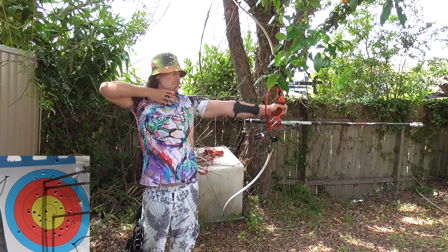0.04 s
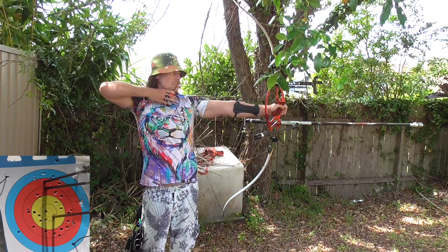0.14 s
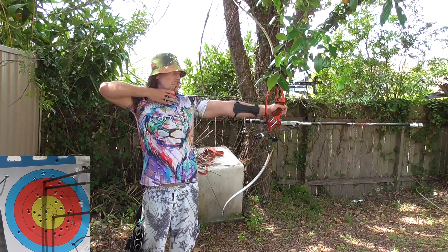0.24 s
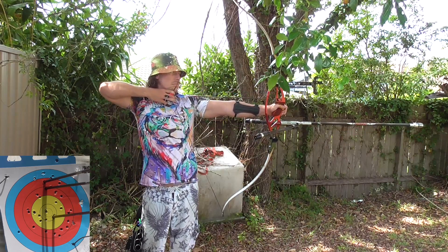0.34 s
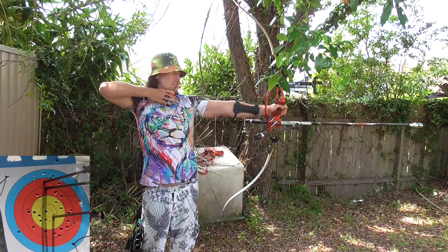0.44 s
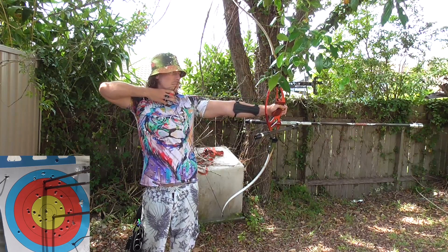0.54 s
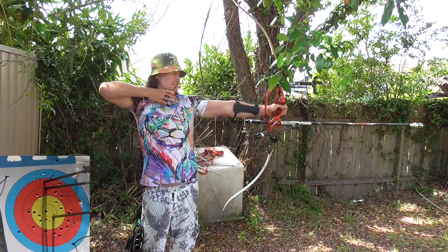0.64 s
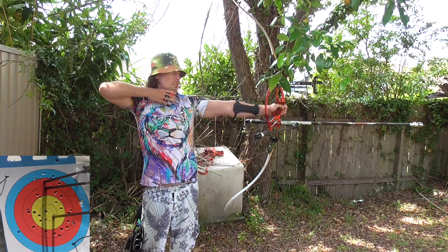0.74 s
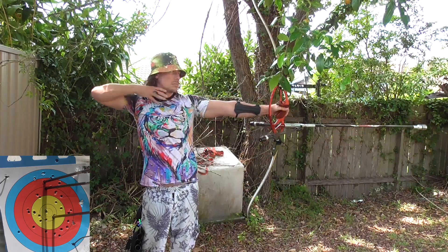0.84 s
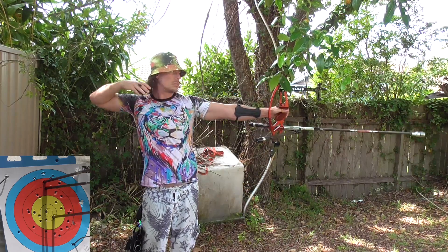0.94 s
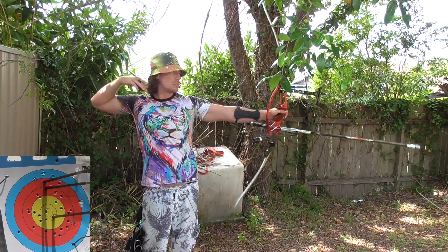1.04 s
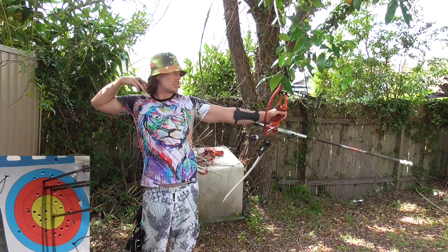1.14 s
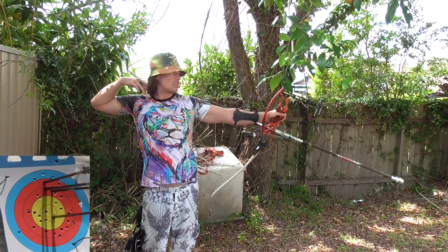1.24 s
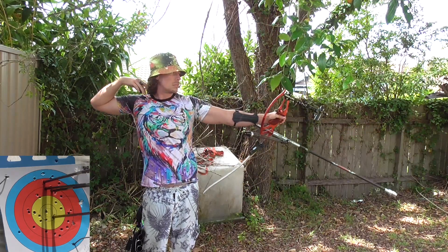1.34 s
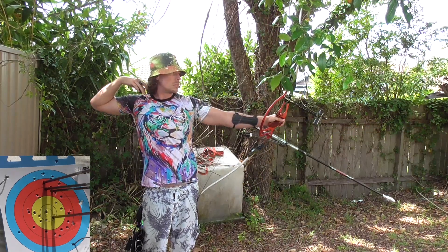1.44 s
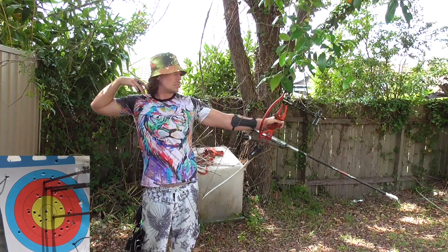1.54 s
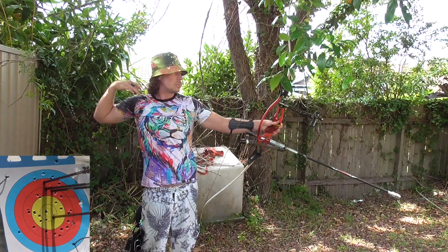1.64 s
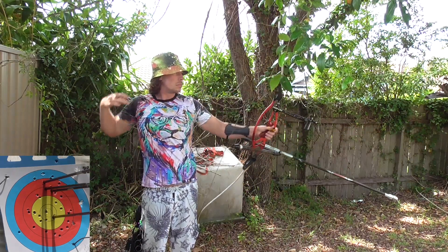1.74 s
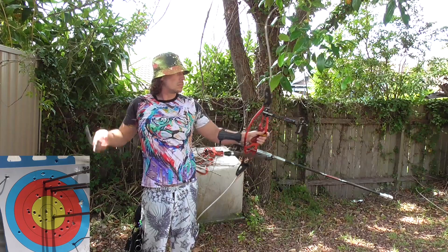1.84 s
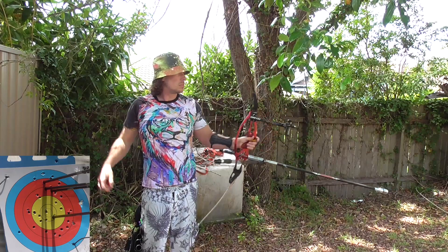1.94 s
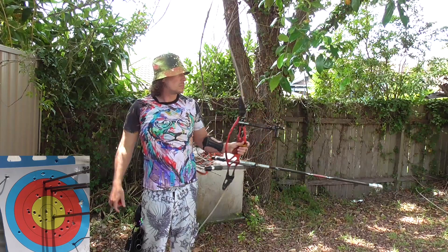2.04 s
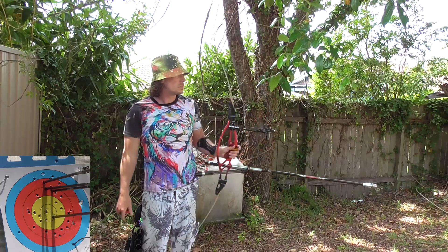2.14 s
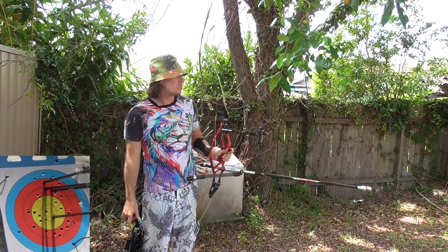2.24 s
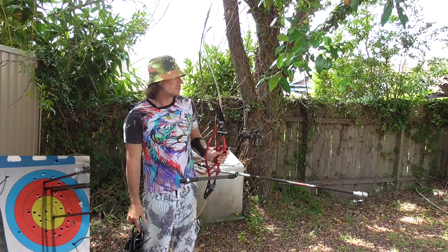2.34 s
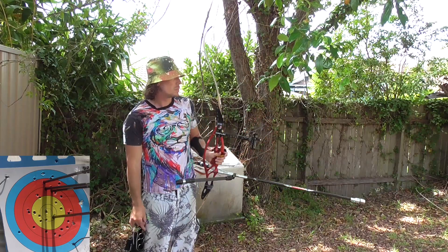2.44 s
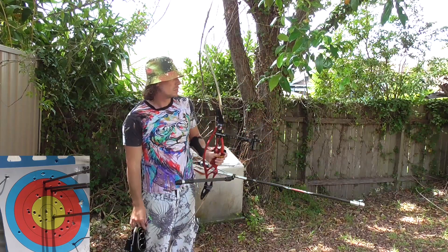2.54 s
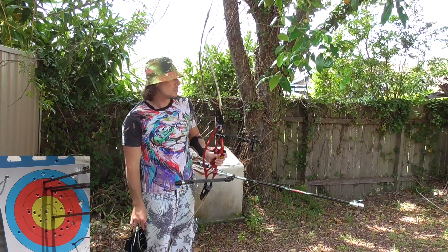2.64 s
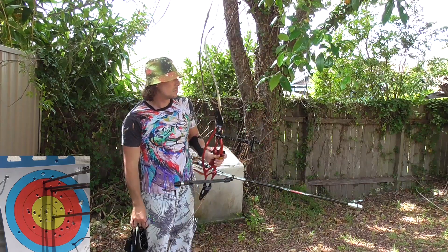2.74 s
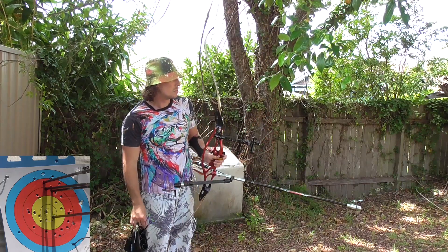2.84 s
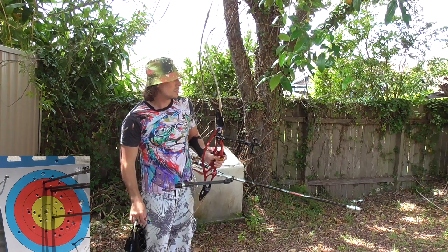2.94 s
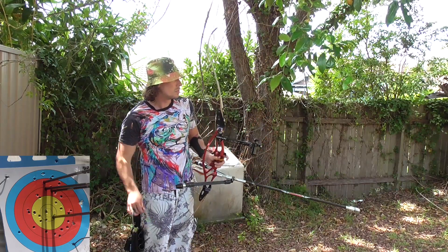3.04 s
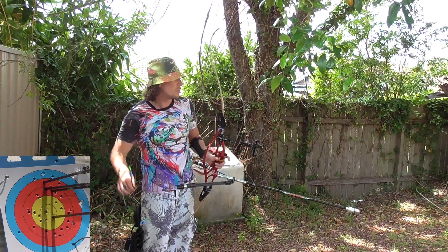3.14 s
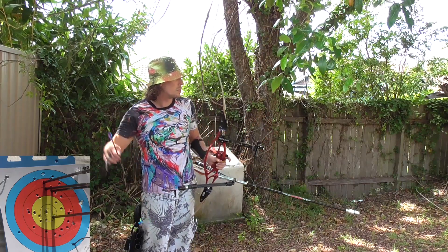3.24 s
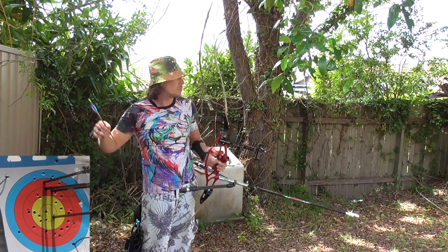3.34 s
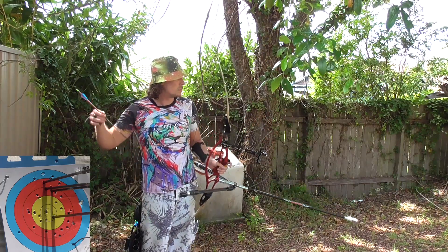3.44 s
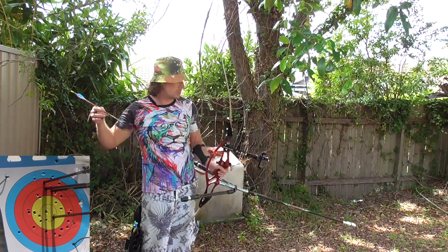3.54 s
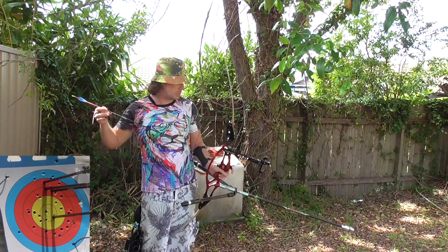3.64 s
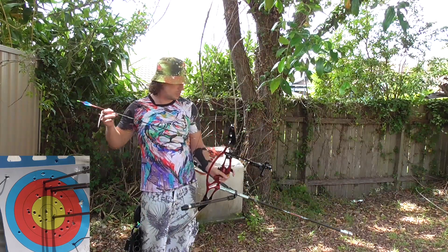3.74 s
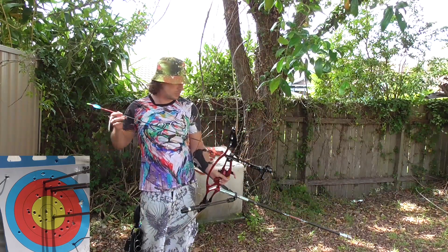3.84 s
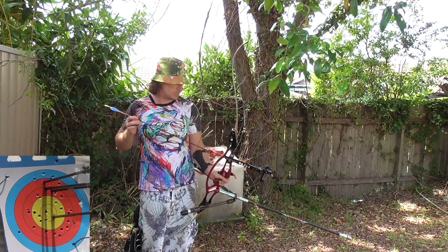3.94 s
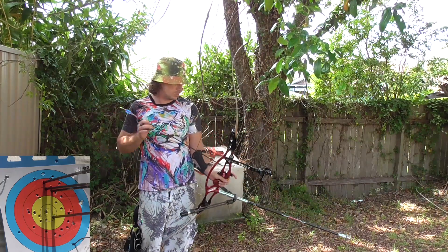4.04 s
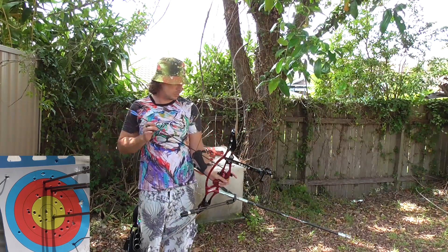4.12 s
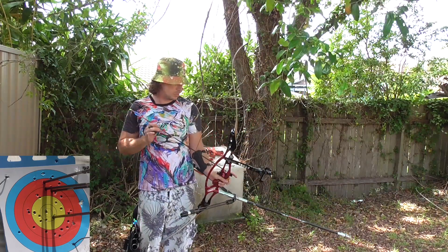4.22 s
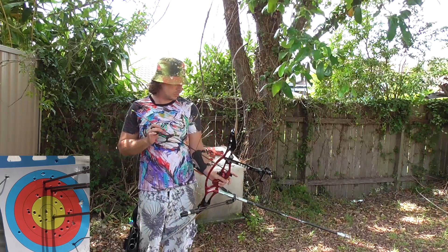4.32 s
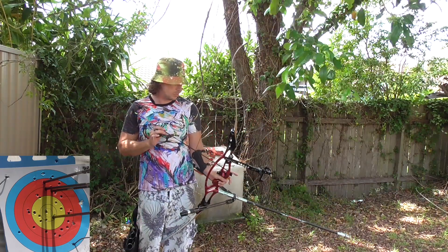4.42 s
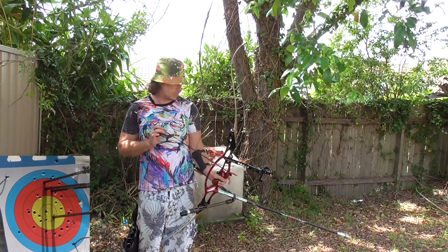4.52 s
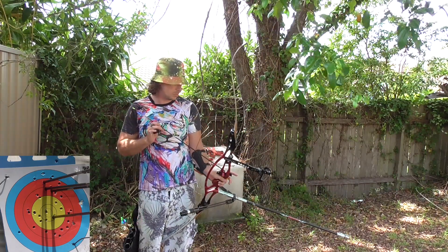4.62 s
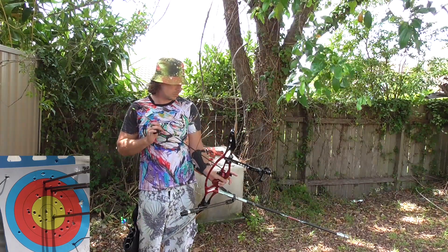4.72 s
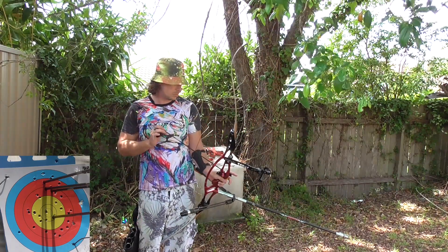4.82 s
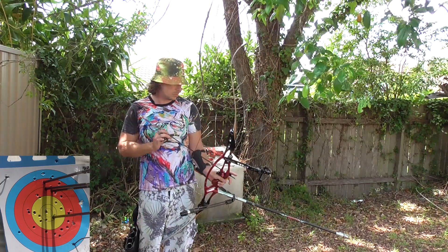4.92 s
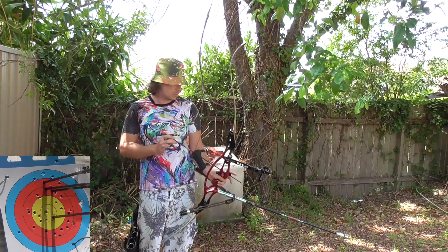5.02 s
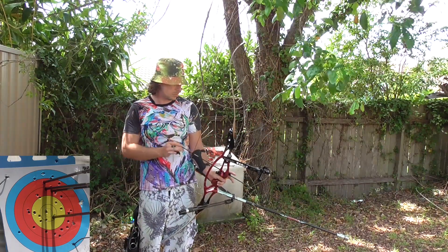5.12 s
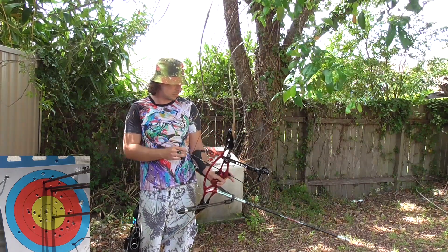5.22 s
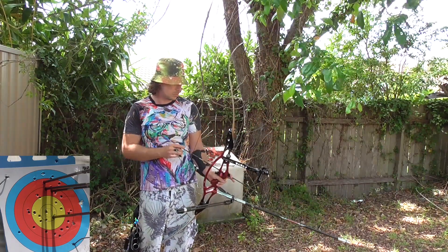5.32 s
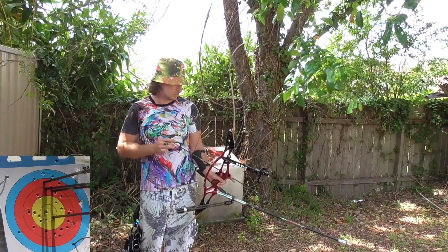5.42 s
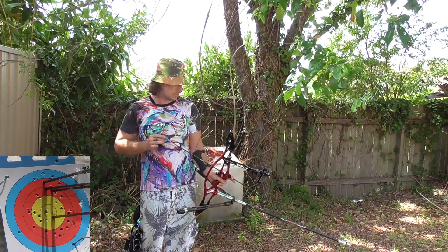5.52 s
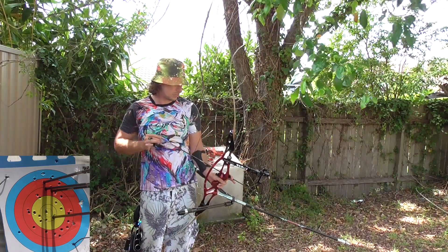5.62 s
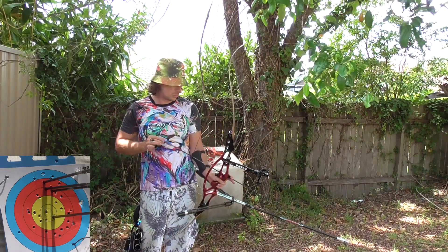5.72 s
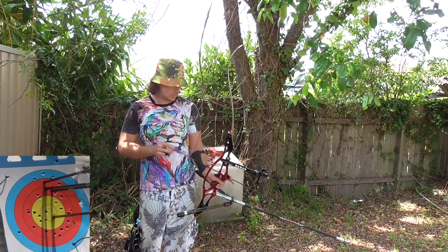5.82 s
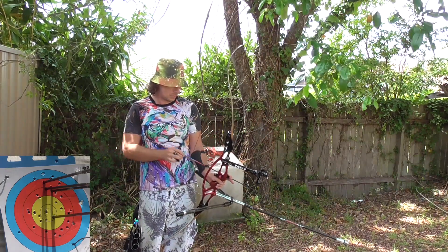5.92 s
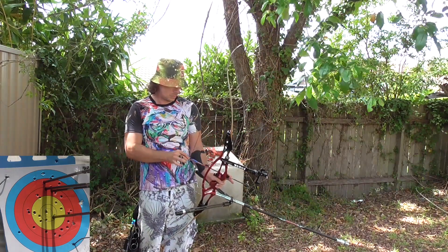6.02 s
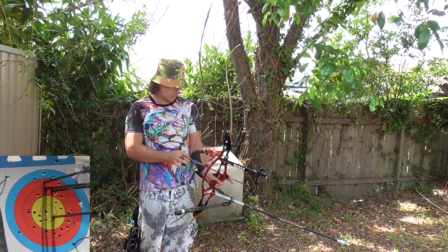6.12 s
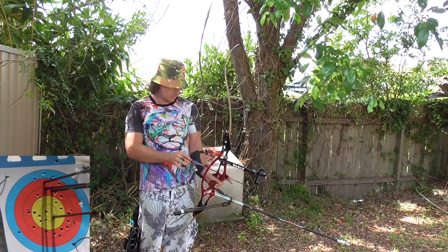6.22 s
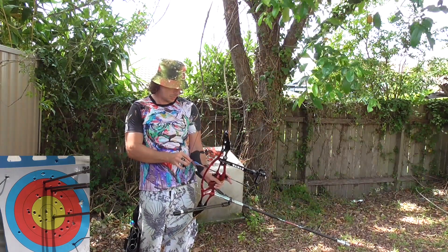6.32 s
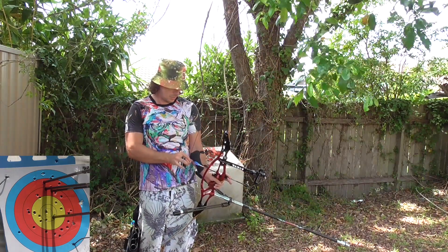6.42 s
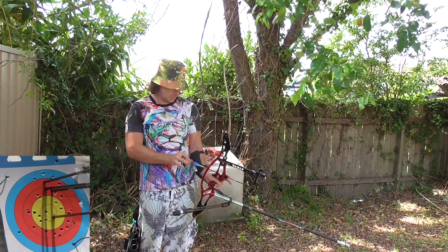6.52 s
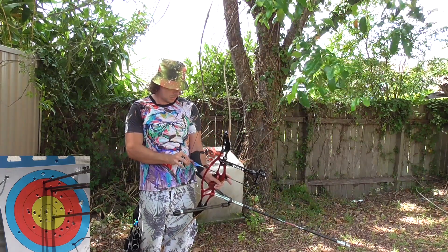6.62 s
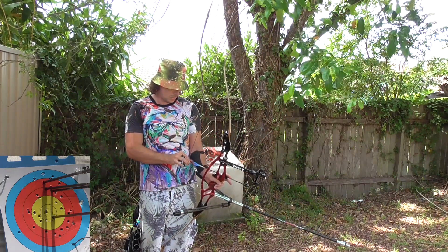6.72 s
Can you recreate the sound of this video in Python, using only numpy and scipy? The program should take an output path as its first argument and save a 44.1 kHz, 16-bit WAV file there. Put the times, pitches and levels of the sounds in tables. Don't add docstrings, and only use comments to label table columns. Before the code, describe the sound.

Outdoors in a small fenced yard, faint traffic rumble and leaf hiss. A thin steel blade clicks and bounces, then a bow releases with a loud, sharp crack and buzzing rattle. A softer thump follows as the arrow strikes. The bow swings down with a faint low moan; soft rubbing and quiver knocks lead to crisp hollow taps and small squeaky scrapes. A small nearby microphone overloads slightly on the shot.

```python
import sys
import numpy as np
from scipy import signal
from scipy.fft import rfft, irfft
from scipy.io import wavfile
from scipy.ndimage import uniform_filter1d

SR = 44100
rng = np.random.default_rng(int(sys.argv[2]) if len(sys.argv) > 2 else 0)


def amplitude_ratio(level_db):
    exponent = np.asarray(level_db, float) / 20
    return 10 ** exponent


def transcribe(u):
    v = np.clip(np.atleast_2d(u).T, -1, 1)
    q = np.round(v * 32767).astype(np.int16)
    wavfile.write(sys.argv[1], SR, q)


N = 298557
BORE_HZ = 888


def evened(x):
    return x / np.sqrt(np.mean(x ** 2) + 1e-20)


def read(points, hz):
    f, value = np.transpose(points)
    return np.interp(np.log(hz + 1), np.log(f + 1), value)


def along(rows):
    s, level_db = np.transpose(rows)
    return np.interp(np.arange(N) / SR, s, level_db)


def add(mix, s, sound):
    part = mix[round(s * SR):][:len(sound)]
    part += sound[:len(part)]


def burst(s, rise, peak_db, hold, fade):
    t = np.arange(N) / SR - s
    climb_db = 30 * np.minimum(t, 0) / rise
    fade_db = fade * np.maximum(t - hold, 0)
    return amplitude_ratio(peak_db + climb_db - fade_db)


def resonate(x, hz, width):
    turn = np.exp(2j * np.pi * np.cumsum(hz * np.ones(len(x))) / SR)
    r = np.exp(-np.pi * width / SR)
    return 2 * (turn * signal.lfilter([1 - r], [1, -r], x / turn + 1e-18)).real


def resonate_twice(x, hz, width):
    return resonate(resonate(x, hz, width), hz, width)


def noise(colour, patchy_db, size=512):
    hz = np.fft.rfftfreq(size, 1 / SR)
    a, b, patches = rng.standard_normal((4 * N // size + 5, len(hz), 3)).T
    patches = uniform_filter1d(patches, size=7, axis=0)
    patches = evened(uniform_filter1d(patches, size=12, axis=1))
    outside = (hz < colour[0][0]) | (hz > colour[-1][0])
    level_db = np.where(outside, -99, read(colour, hz))
    z = (a + 1j * b) * amplitude_ratio(level_db[:, None] + patchy_db * patches)
    return evened(signal.istft(z, nperseg=size, noverlap=size - size // 4)[1][:N])


def fuzzy_tone(hz, width, clean):
    tone = np.sqrt(2) * np.sin(2 * np.pi * np.cumsum(hz * np.ones(N)) / SR)
    fuzz = evened(resonate_twice(rng.standard_normal(N), hz, width))
    return evened(clean * tone + fuzz)


def ring(modes, seconds):
    t = np.arange(round(seconds * SR)) / SR
    out = 0
    for k, (hz, db, t60) in enumerate(modes):
        out = out + (-1) ** k * amplitude_ratio(db - 60 * t / t60) * np.sin(2 * np.pi * hz * t)
    return out


def struck(blows, modes, sense, ring_db, lead, trail):
    out, body = np.zeros(N), ring(modes, 1.)
    reach = 220
    for s, db, ms in blows:
        u = np.arange(-reach, reach) / SR / (ms / 1000)
        swing = (1 - np.where(u < 0, lead, trail) * u ** 2) * np.exp(-u ** 2 / 2)
        add(out, s - reach / SR, sense * amplitude_ratio(db) * swing)
        add(out, s, amplitude_ratio(db + ring_db) * body)
    return out


def bore(x, feedback):
    loop = np.zeros(round(SR / BORE_HZ) + 1)
    loop[0], loop[-1] = 1, -feedback
    return signal.lfilter([1], loop, x)


def traffic():
    # (time [s], level [dB])
    road = [(0.0, -48.5), (1.22, -52.5), (1.32, -52.5), (2.07, -56), (2.77, -51.5), (3.86, -54.5),
            (4.07, -51.5), (5.0, -60), (5.75, -60), (6.28, -55.5), (6.77, -56)]
    # (time [s], level [dB])
    engine = [(0.0, -53), (0.22, -57), (0.62, -58), (1.0, -60), (1.36, -60.5), (1.66, -63.5), (1.77, -63),
              (2.9, -59), (3.09, -56.5), (4.26, -54.5), (4.58, -67), (4.92, -65), (5.33, -62.5),
              (5.64, -67.5), (6.01, -60.5), (6.77, -63.5)]
    # (time [s], level [dB])
    breeze = [(0.0, -59), (1.21, -57.5), (1.47, -61), (3.28, -56), (4.79, -59), (5.0, -58.5), (5.62, -63),
              (6.07, -60), (6.77, -59.5)]
    # (frequency [Hz], level [dB per Hz])
    rumble_colour = [(12, -39), (20, -20), (48, 5.5), (70, 4), (109, -2.5), (203, 0), (264, -5.5),
                     (400, -11.5), (520, -34), (880, -120)]
    roar_colour = [(150, -21.5), (300, -3.5), (500, -0.5), (900, -2.5), (1400, -8), (2200, -16),
                   (3500, -39)]
    leaves_colour = [(1200, -14), (2000, 0.5), (4000, 0.5), (7000, -6.5), (10000, -13), (11500, -21),
                     (15500, -17.5)]
    # (frequency [Hz], width [Hz], level over the engine [dB], fading [dB per s])
    hum_lines = [(71.8, 4.3, 5.5, -0.77), (149.5, 12, 5, -3), (207.4, 14, -11.5, 1.52)]
    road_db, engine_db, breeze_db = along(road), along(engine), along(breeze)
    rumble_db = -54.0 + 0.45 * (engine_db - engine_db.mean()) + 0.15 * (road_db - road_db.mean())
    out = amplitude_ratio(rumble_db) * noise(rumble_colour, 1.5, size=2048)
    out += amplitude_ratio(road_db + 0.87) * noise(roar_colour, 1.97, size=1024)
    out += amplitude_ratio(breeze_db - 1.44) * noise(leaves_colour, 1.6)
    for hz, width, over_db, fading in hum_lines:
        hum_db = engine_db + over_db + fading * np.arange(N) / SR
        out += amplitude_ratio(hum_db) * fuzzy_tone(hz, width, 1.7)
    return out


def clicker():
    # (time [s], peak level [dB])
    bounces = [
        (0.675, -32.5),
        (0.6968, -33),
        (0.7166, -36.5),
        (0.739, -45),
        (0.791, -45),
    ]
    # (frequency [Hz], level [dB], time to die by 60 dB [s])
    blade_modes = [(1600, -5, 0.038), (1920, -4, 0.024), (2420, 0, 0.047), (2860, -6, 0.015),
                   (3190, -1.5, 0.028), (3400, -3, 0.037), (3700, 2, 0.013), (4400, -6, 0.0079),
                   (5540, -10, 0.014), (10030, -13, 0.13), (10020, -22, .08), (9580, -9, 0.04),
                   (10900, -10, 0.0099)]
    out = np.zeros(N)
    for s, db in bounces:
        chatter = rng.standard_normal(900) * np.exp(-np.arange(900) / 530.0)
        add(out, s, amplitude_ratio(db - 28.5) * np.convolve(chatter, ring(blade_modes, .2)))
    return out


def rattles():
    # (time [s], peak level [dB], ring frequency [Hz], brightness [dB])
    ticks = [(.8338, -23.5, 3860, -9), (.870, -25, 3200, -7), (0.879, -7.5, 4200, -16),
             (.8812, -8, 2800, -1), (.8822, -9, 4300, -6), (0.8957, -2, 5280, -7), (.9092, -4, 2050, -14),
             (0.9108, -8, 3200, -15), (.9172, -3, 2300, -14), (.9195, -10, 2900, -12),
             (.9225, -1, 2100, -12), (0.938, -17, 2920, -5), (.9435, -19, 2600, -13), (.955, -26, 3000, -6),
             (0.965, -20, 3100, -1), (0.9759, -12, 2600, -2), (0.9866, -8, 2210, -2), (0.998, -16, 2300, 3),
             (1.009, -27, 2300, 6), (1.0205, -14, 2300, -6), (1.0255, -24, 2500, -2),
             (1.0538, -19, 2100, -4), (1.064, -24, 2200, -1), (1.103, -35, 6000, -4),
             (1.166, -32, 2400, -6), (1.234, -29, 4900, -7), (1.377, -25.5, 3800, -19)]
    out = np.zeros(N)
    for s, db, hz, bright_db in ticks:
        tick = ring([(hz, -.1, .005), (1.4 * hz, -8, .003),
                     (4900, bright_db, .0025), (6300, bright_db - 6.0, .0025),
                     (8100, bright_db - 5.5, .002), (10300, bright_db - 16, .002)], .02)
        soft_start = np.minimum(np.arange(len(tick)) / 4.0, 1)
        add(out, s + 0.00053, amplitude_ratio(db - 7.5) * tick * soft_start)
    return out


def bow():
    # (time [s], blow level [dB], contact time [ms])
    blows = [(.8825, -21, 1.3), (.8850, -19, 0.85), (.8998, -5, 0.77), (.9047, -10, 1.2),
             (.9085, -16, 0.34), (.9112, -5.5, 0.24), (.9163, -10, 0.32), (.9192, -6.5, 0.23),
             (.9229, -10.5, 0.38), (.9272, -14.5, 0.54), (.935, -9.5, 0.88), (.9475, -12, 0.7),
             (.9585, -12.5, 1.1), (.970, -19, 1.2)]
    # (time [s], blow level [dB], contact time [ms])
    rebounds = [(.9015, -3, 1.1), (.9074, -6, .6), (.9214, -3, 0.66), (.9255, -10, .5), (.9292, -7, .6),
                (.9335, -7, .7), (.9443, -6, 0.48)]
    # (frequency [Hz], level [dB], time to die by 60 dB [s])
    limb_modes = [(91.8, -4, 0.14), (149, -34, 0.062), (170, -9, 0.12), (188, -8, 0.054), (240, -9, 0.084),
                  (288, -8.5, 0.17), (345, -19, 0.3), (460, -12.5, 0.17), (746, -1.5, 0.17),
                  (1124, -11, 0.11), (2140, -10, 0.014), (3100, -8, 0.014)]
    riser_modes = [(560, 1, 0.06), (740, 7, 0.09), (950, -3, 0.0506), (1010, -7, 0.05), (1145, -7, 0.079),
                   (1290, -1, 0.03), (1680, 2, 0.03), (2050, 5, 0.018), (2400, -6, 0.02), (2900, 3.5, 0.02),
                   (3250, 1, 0.016), (3800, 1, 0.015)]
    # (time [s], rise [s], peak level [dB], hold [s], fade [dB per s])
    buzz_bursts = [
        (0.882, 0.0062, -18, 0.00091, 1700),
        (0.897, 0.025, -22.5, 0.063, 269),
        (1.052, .03, -49, 0.019, 152),
    ]
    # (frequency [Hz], level [dB per Hz])
    buzz_colour = [(180, -46), (300, 2.5), (643, -10), (747, -3), (1130, -11), (1520, -9), (2090, -9.5),
                   (2310, -10.5), (6000, -22), (9290, -27.5), (15800, -46)]
    out = struck(blows, limb_modes, -1.12, -12, .25, .7)
    out += struck(rebounds, limb_modes, 0.47, -26.5, 0.47, 0.27)
    grain = amplitude_ratio(3.4 * evened(uniform_filter1d(rng.standard_normal(N), size=70)))
    shake = sum(burst(*row) for row in buzz_bursts) * evened(grain)
    out += shake * noise(buzz_colour, 0.44)
    riser = ring(riser_modes, 0.35)
    riser /= np.linalg.norm(riser)
    out += amplitude_ratio(-4.5) * signal.fftconvolve(shake * rng.standard_normal(N), riser)[:N]
    return out + rattles()


def squeaks():
    # (start [s], length
    # [s], level [dB], from [Hz], to [Hz])
    squeals = [(.8895, 0.0047, -24, 2250, 3100), (.909, 0.0044, -13.5, 1980, 2100),
               (.9095, .005, -29, 3100, 3300), (0.914, .012, -19, 2050, 2170),
               (0.923, .012, -26.5, 3200, 2900), (0.943, .024, -32.5, 2750, 3130),
               (0.973, .028, -34.5, 2250, 2150), (1.2475, 0.0034, -32, 3930, 3850),
               (1.2435, 0.0055, -42.5, 5600, 5500), (1.255, .005, -46, 5660, 5700)]
    # (start [s], length [s], level [dB], from [Hz], to [Hz])
    scrapes = [(3.093, 0.035, -65, 5900, 5500), (3.165, 0.036, -55, 4130, 3540),
               (3.18, 0.045, -56, 9050, 8800), (3.15, .09, -60, 8050, 8000),
               (3.286, 0.039, -51, 7200, 7100), (4.4, 0.17, -61.5, 3500, 3470),
               (4.465, 0.035, -65, 6500, 5900), (4.516, 0.035, -55, 3240, 3500),
               (4.52, 0.027, -59, 4800, 4600), (4.617, .05, -63, 10100, 10200),
               (4.618, .05, -64, 8700, 8700), (4.722, 0.022, -49.5, 3190, 2870),
               (4.752, 0.026, -48.5, 3520, 2980), (4.841, 0.038, -49, 2500, 4800),
               (4.862, 0.054, -43.5, 3210, 2960), (4.875, 0.033, -50, 4500, 4400),
               (4.935, 0.072, -46, 6040, 6100), (4.944, .05, -48, 6900, 6900),
               (4.958, 0.05, -48, 5500, 4900), (4.954, 0.05, -52, 10900, 11000),
               (5.002, 0.21, -56, 4750, 5240), (5.135, 0.13, -52, 4100, 3550),
               (5.15, 0.12, -53, 3100, 3160), (5.263, 0.071, -58, 3920, 4170),
               (5.198, 0.24, -63.5, 2560, 2610), (5.806, 0.13, -57, 4500, 4570),
               (5.83, 0.09, -56.5, 3630, 4000), (5.8, 0.12, -60.5, 2600, 2780),
               (5.851, 0.059, -58.5, 7340, 6200), (5.9, 0.041, -59, 5430, 5300),
               (5.975, .11, -53, 2810, 3400), (5.987, 0.033, -54, 5200, 4830),
               (6.028, 0.029, -49.5, 5570, 5400), (6.04, 0.049, -53, 3700, 4120),
               (6.113, .06, -59, 2600, 2540), (6.22, 0.1, -58, 3600, 3250), (6.297, 0.22, -61, 3700, 3250),
               (6.228, 0.087, -58, 2520, 2570), (6.29, 0.26, -62, 2800, 2400),
               (6.47, 0.16, -65, 5650, 5830)]
    out, white = np.zeros(N), noise([(900, -.1), (15000, -.1)], 1.1, size=256)
    wander = evened(uniform_filter1d(rng.standard_normal(N), size=500))
    for s, length, db, from_hz, to_hz in [*scrapes, *squeals]:
        u = np.arange(round(length * SR)) / (length * SR)
        on = round(s * SR) + np.arange(len(u))
        hz = (from_hz + (to_hz - from_hz) * u) * (1 + 0.028 * wander[on])
        width = 450 * np.sqrt(from_hz / 3500)
        squeak = evened(resonate_twice(white[on], hz, width))
        add(out, s, amplitude_ratio(db) * np.sin(np.pi * u) ** 0.52 * squeak)
    return out


def string_hum():
    start, stop, modes = (.9083, 1.25, [(92, -36, .7), (180.2, -35, 1.2), (172.5, -32, 1.25),
                          (287, -27, .3), (172, -13, .215), (464, -37, .45), (455, -34, .5),
                          (737, -21, .24), (94, -20, .2)])
    t = np.arange(SR) / SR
    damping = amplitude_ratio(-400 * np.maximum(t - stop + start, 0))
    out = np.zeros(N)
    add(out, start, ring(modes, 1.) * np.minimum(t / .02, 1) * damping)
    return out


def target():
    # (time [s], blow level [dB], contact time [ms])
    thumps = [(1.2372, -15, 0.2), (1.2385, -5.5, 0.21), (1.2393, -14, 0.47), (1.2451, -7, 0.28),
              (1.2459, -21, 0.41), (1.2502, -29, 0.25), (1.2563, -24, 0.46), (1.2606, -23, 0.32),
              (1.3135, -42, 0.29), (1.319, -34, 0.28), (1.333, -41, .3)]
    # (frequency [Hz], level [dB], time to die by 60 dB [s])
    butt_modes = [(193, 0, 0.058), (312, 8.5, 0.032), (466, -5.5, 0.13), (670, -26, 0.015),
                  (900, -23, 0.022), (1080, -16, 0.019), (1340, -20, 0.016), (1663, 2, .025),
                  (1860, 3, 0.017), (2280, -4, 0.036), (3970, -17, 0.04), (7880, -23, 0.023)]
    # (time [s], rise [s], peak level [dB], hold [s], fade [dB per s])
    far_echoes = [
        (1.242, 0.0076, -25, .003, 379),
        (1.333, 0.11, -44, 0.019, 133),
    ]
    # (frequency [Hz], level [dB per Hz])
    far_colour = [(150, -45), (250, -11), (340, -19), (387, -39), (486, -8), (884, -6.5), (1750, -7.5),
                  (2500, -16.5), (5340, -25.5), (12000, -48), (15600, -72), (22000, -120)]
    scatter = sum(burst(*row) for row in far_echoes) * noise(far_colour, 1.3)
    return struck(thumps, butt_modes, 1, -17, 1.1, 0.58) + scatter


def rubbing():
    # (loudest time [s], rise [s], fall [s], level [dB], main resonance [Hz])
    strokes = [(1.66, 0.07, 0.11, -59, 4650), (1.81, 0.16, 0.16, -53, 5330),
               (2.5, 0.039, 0.077, -55.5, 4480), (2.609, 0.005, 0.038, -50, 5900),
               (2.652, .015, .025, -54, 5570), (2.749, .003, 0.024, -45.5, 5600),
               (2.828, 0.0035, 0.049, -52, 6950), (3.13, 0.082, 0.23, -55, 3700),
               (3.24, 0.25, 0.067, -53.5, 4130), (3.3, 0.026, 0.023, -46.5, 6900),
               (4.525, 0.01, 0.032, -51, 5000), (4.976, 0.072, 0.11, -48, 6160),
               (5.134, 0.097, 0.22, -49.5, 4540), (5.31, .06, 0.05, -71, 4100),
               (5.59, 0.028, 0.049, -58, 4550), (5.868, 0.074, 0.29, -54.5, 4770),
               (5.95, 0.055, 0.05, -57.5, 5000), (6.04, 0.062, 0.075, -49, 4130),
               (6.12, 0.033, 0.066, -58, 2970)]
    # (frequency [Hz], level [dB per Hz])
    rub_colour = [(1200, -3.5), (2200, 3.5), (4000, 0), (7000, 0), (10500, -8), (12500, -16.5),
                  (15500, -24)]
    tube_modes = [(0.947, -4.2), (0.77, -7.0), (1.09, -5), (1.26, -5.5)]  # (share of main pitch, dB)
    out = np.zeros(N)
    hiss = evened(bore(noise(rub_colour, 2.3, size=256), 0.041))
    white = noise([(900, -.1), (15000, -.1)], 8.8, size=256)
    grain = amplitude_ratio(2.3 * evened(uniform_filter1d(rng.standard_normal(N), size=40)))
    for s, rise, fall, db, hz in strokes:
        t = np.arange(-rise, fall, 1 / SR)
        u = np.where(t < 0, t / rise, t / fall)
        on = round(s * SR) + np.round(t * SR).astype(int)
        glide = hz * (1 - 0.066 * u)
        tube = 0
        for k, k_db in tube_modes:
            tube = tube + amplitude_ratio(k_db) * evened(resonate_twice(white[on], np.minimum(k * glide, 13000), 600))
        stroke = evened(1.7 * hiss[on] + 1.1 * evened(tube))
        add(out, s + t[0], amplitude_ratio(db - 16 * abs(u) ** 0.98) * stroke)
    return (out + squeaks()) * evened(grain)


def sling():
    # (time [s], rise [s], peak level [dB], hold [s], fade [dB per s])
    moan_swell = (1.862, 0.33, -43, 0.025, 120)
    bump = (2.078, .012, -50, .004, 700)
    start, stop = 1.74, 1.93
    moan_hz, sag_hz_per_s = 176, 432
    t = np.arange(N) / SR
    u = np.clip((t - start) / (stop - start), 0, 1)
    on = uniform_filter1d(1. * (t > start) * (t < stop), size=500)
    moan = fuzzy_tone(moan_hz - sag_hz_per_s * u * (stop - start), 30, 1.7)
    rush = noise([(60, -6), (120, -3.0), (260, -6.0), (380, -20)], 0.83)
    rush_gain = on * amplitude_ratio(-50.5 - 14 * (0.5 - u))
    return on * burst(*moan_swell) * moan + (rush_gain + burst(*bump)) * rush


def taps():
    # (time [s], peak level [dB], low ring [Hz], high ring [Hz], high over low [dB])
    quiver_taps = [(1.9081, -47.5, 2050, 7500, 9.5), (2.139, -48, 2930, 7960, -12),
                   (2.603, -39, 5270, 10700, 0), (2.7452, -38.5, 4950, 8400, 3),
                   (2.7675, -48, 3000, 9450, 2), (2.8231, -40.5, 2300, 10000, 8),
                   (3.2525, -42, 3890, 8130, -3), (3.2942, -49, 3920, 8750, 13),
                   (3.3086, -44, 4600, 9740, 3), (2.7492, -39, 5800, 8000, -8),
                   (2.7455, -42, 2400, 5550, -4), (5.515, -48, 2520, 8000, -16)]
    riser_taps = [(3.6194, -54, 2620, 8060, -7), (4.1247, -45, 2780, 8040, -1),
                  (4.3251, -13, 3800, 9600, 3), (4.347, -23, 3630, 9700, 2.5),
                  (4.356, -32, 3900, 10100, -10), (4.3817, -39, 3900, 8640, -16),
                  (4.4107, -46, 2820, 9000, -7), (4.5184, -34, 4700, 6200, -4.5),
                  (4.5195, -33, 2620, 9800, -12.5), (4.7432, -18, 4000, 10500, 6),
                  (4.7466, -33.5, 4000, 10500, -5), (4.7501, -29.5, 3500, 9000, -8),
                  (4.7566, -30, 3870, 10300, -6), (4.837, -37.5, 3180, 9300, -15),
                  (4.8679, -23.5, 3940, 10130, 4), (4.8713, -34, 4600, 10340, -3),
                  (4.8744, -34, 3500, 9500, -8), (4.8799, -31, 5000, 10300, -1),
                  (4.8834, -38, 3300, 9800, -5), (4.8868, -31, 3500, 9500, -6),
                  (4.8884, -31, 3300, 9800, -5), (4.8925, -43, 3500, 9300, -5),
                  (4.7642, -42, 3300, 9000, -14), (4.899, -27, 3800, 9700, 0), (5.1455, -45, 3800, 8720, 1),
                  (6.0428, -43, 3300, 9800, -19)]
    # (share of low or high ring, level [dB], time to die by 60 dB [s])
    linger_low = [(.74, -14.5, 0.0082), (0.951, -20.5, .009), (1.45, -21.5, .009), (1.8, -20, .008)]
    linger_high = [(.8, -21, .008), (.92, -24.5, .009), (1.02, -21.5, .009)]
    # (time [s], tones (frequency [Hz], level [dB], time to die by 60 dB [s]))
    nock_s, nock_modes = (5.694, [(2270, -44, 0.034), (3540, -47, 0.014), (4380, -50, .015),
                          (6000, -55, .008), (7900, -48, 0.0081)])
    out = np.zeros(N)
    add(out, nock_s, ring(nock_modes, .03))
    for rows, feedback, slow, lag in [(quiver_taps, .3, 2.6, .0005), (riser_taps, .05, .95, .0008)]:
        for s, db, low_hz, high_hz, high_db in rows:
            mid_db = -1.5 + 0.28 * high_db
            snap = [(0.64 * low_hz, -9, .004), (low_hz, -.1, .0026), (5900, mid_db, .0016),
                    (0.806 * high_hz, high_db - 4.5, .0026), (high_hz, high_db, .0025),
                    (13500, high_db - 17.5, .0012)]
            click = ring([(hz, mode_db, slow * t60) for hz, mode_db, t60 in snap], .03)
            click += ring([(k * low_hz, k_db, t60) for k, k_db, t60 in linger_low], .03)
            click += ring([(k * high_hz, high_db + k_db, t60) for k, k_db, t60 in linger_high], .03)
            if rows is quiver_taps:
                pipe = [(k * BORE_HZ, -23 + 5 * rng.standard_normal(), 0.05) for k in range(3, 14)]
                add(out, s + lag, amplitude_ratio(db + 3.5 + 0.55 * high_db) * ring(pipe, .05))
            soft_start = np.minimum(np.arange(len(click)) / 8.3, 1)
            gain = amplitude_ratio(db + 8.0 - 5.5 * np.log2(slow))
            add(out, s + lag, gain * bore(click, feedback) * soft_start)
    return out


def shelf(x):
    x = signal.sosfilt(signal.butter(2, 1300, "high", fs=SR, output="sos"), x)
    dulled = signal.sosfilt(signal.butter(8, 11300, fs=SR, output="sos"), x)
    return dulled + amplitude_ratio(-24) * x


def yard(x, tail_db, echoes):
    # (frequency [Hz], time to die by 60 dB [s])
    yard_t60 = [(200, 0.39), (1000, 0.095), (4000, 0.09), (10000, 0.08)]
    hz, t, z = signal.stft(rng.standard_normal(SR // 2), SR, nperseg=128)
    tail = signal.istft(z * amplitude_ratio(-60 * t / read(yard_t60, hz)[:, None]), SR, nperseg=128)[1]
    tail *= np.minimum(np.arange(len(tail)) / 300, 1) ** 2
    tail *= amplitude_ratio(tail_db) / np.linalg.norm(tail)
    tail[0] = 1
    for ms, db in echoes:
        tail[round(ms * SR / 1000)] += amplitude_ratio(db)
    return signal.fftconvolve(x, tail)[:N]


def scene():
    # (delay [ms], level [dB])
    near_echoes = [
        (1.9, -16.5),
        (3.4, -16.5),
    ]
    tap_echoes = [
        (1.5, -17.5),
        (1.85, -20),
        (3.4, -14),
    ]
    near = yard(clicker() + shelf(taps()), -15.0, tap_echoes)
    near += yard(bow(), -17.0, near_echoes)
    near += string_hum() + target()
    return (traffic() + near + rubbing() + sling())[None]


def top_cut(x):
    return signal.sosfilt(signal.butter(12, 16580, fs=SR, output="sos"), x)


def record(dry):
    # (frequency [Hz], level [dB])
    mic = [(30, -9), (80, -1.5), (11000, 0.06), (12000, 1), (15700, -6)]
    ceiling = .85
    hz = np.fft.rfftfreq(N, 1 / SR)
    squashed = ceiling * np.tanh(dry / ceiling)
    coloured = irfft(rfft(squashed) * amplitude_ratio(read(mic, hz)) * (hz < 15780), N)
    return top_cut(coloured)


dry = scene()
out = record(dry)
transcribe(out)
```